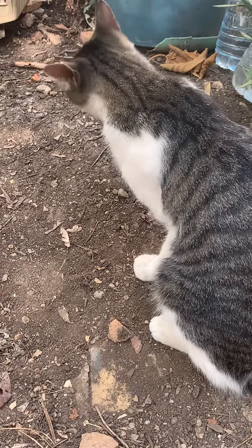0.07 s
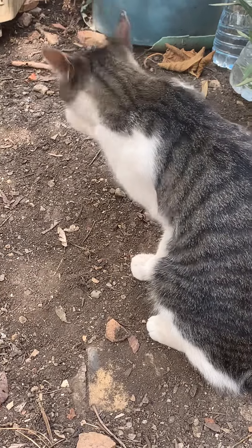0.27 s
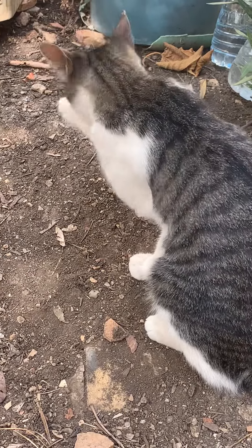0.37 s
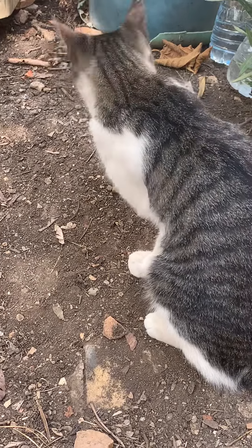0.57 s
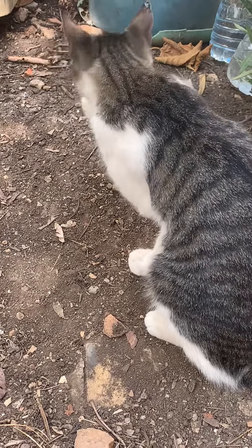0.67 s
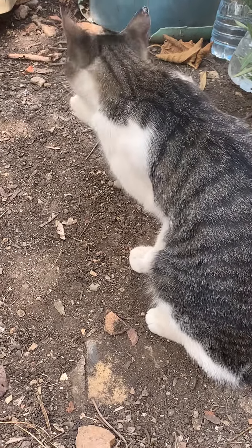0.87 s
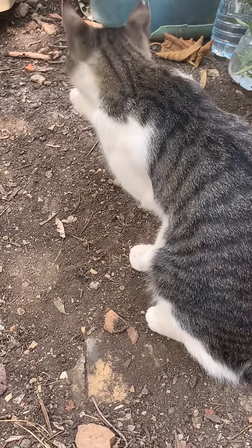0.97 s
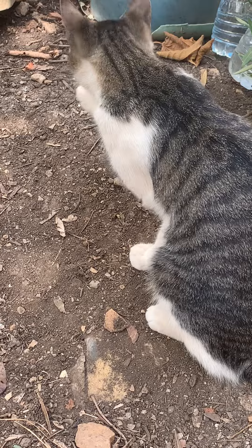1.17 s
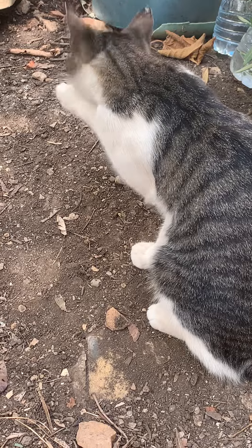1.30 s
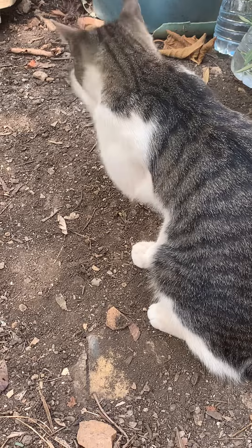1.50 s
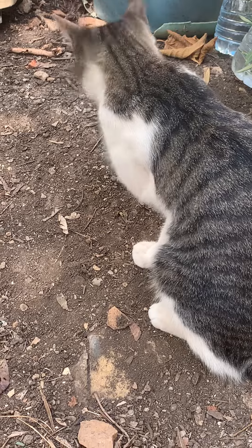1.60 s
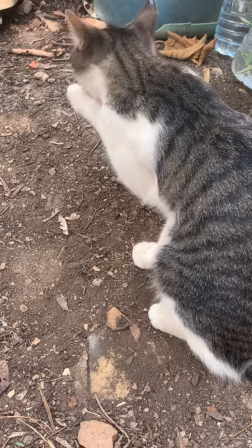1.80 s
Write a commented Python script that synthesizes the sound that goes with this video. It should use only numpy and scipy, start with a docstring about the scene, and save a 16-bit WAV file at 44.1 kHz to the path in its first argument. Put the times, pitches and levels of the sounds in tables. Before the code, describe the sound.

A cat licks its paw in short, thin, raspy strokes, two ending in a wet tick. Low wind rumble and soft bumps hit the hand-held microphone, strongest at the start, while traffic murmurs far off outdoors.

```python
"""A cat washing its paw outdoors

Tongue barbs flick through fur in short, thin, raspy licks, two of them ending in a wet tick.
Air and handling at the hand-held microphone give a low rumble and soft bumps.
Far traffic murmurs behind; near the end come faint distant calls and a soft, narrow-band rustle."""
import sys
import numpy as np
from scipy import signal
from scipy.fft import rfft, irfft, next_fast_len
from scipy.io import wavfile
from scipy.ndimage import uniform_filter1d, map_coordinates

SR = 44100
rng = np.random.default_rng(int(sys.argv[2]) if len(sys.argv) > 2 else 0)


def to_wav(s):
    """Save 16-bit WAV."""
    ch = np.atleast_2d(s).T  # columns
    pcm = np.round(np.clip(ch, -1, 1) * 32767)  # PCM
    wavfile.write(sys.argv[1], SR, pcm.astype(np.int16))


N = 81585
T = np.arange(N) / SR


def amp(db):
    """Amplitude ratio of a level in decibels."""
    return 10 ** (np.asarray(db) / 20)


def unit(x):
    """Normalisation to rms 1."""
    return x / np.sqrt(np.mean(x ** 2) + 1e-20)


def along(points, hz):
    """Interpolation on a logarithmic frequency axis."""
    knots_hz, values = np.transpose(points)
    return np.interp(np.log(hz + 1), np.log(knots_hz + 1), values)


def level(points):
    """Amplitude envelope through (time [s], level [dB]) points."""
    return amp(np.interp(T, *np.transpose(points)))


def swell(start, rise, fall, hold=0):
    """Exponential growth until start, a hold, then decay; rise and fall are times for 20 dB."""
    return amp(-20 * np.maximum(np.maximum((start - T) / rise, (T - start - hold) / fall), 0))


def wobble(knots_per_s):
    """Smooth random modulation: a spline through Gaussian values."""
    return map_coordinates(rng.standard_normal(int(N * knots_per_s / SR) + 4), [T * knots_per_s])


def filtered(x, response):
    """Linear filtering: the spectrum times a complex frequency response."""
    size = next_fast_len(N + SR // 2)
    return irfft(rfft(x, size) * response(np.fft.rfftfreq(size, 1 / SR)), size)[..., :N]


def coloured(x, spectrum):
    """Spectral shaping, at rms 1."""
    return unit(filtered(x, lambda hz: amp(along(spectrum, hz))))


def narrow_noise(hz, width):
    """Narrow-band noise at rms 1, heard as a fuzzy tone."""
    return unit(filtered(rng.standard_normal(N), lambda f: 1 / (1 + ((f - hz) / width) ** 2) ** 0.78))


def even_noise(spectrum):
    """Envelope flattening: noise divided by its smoothed magnitude loses its chance swells."""
    noise = coloured(rng.standard_normal(N), spectrum)
    power = np.abs(signal.hilbert(noise)) ** 2
    smoothed = uniform_filter1d(uniform_filter1d(power, size=900), size=900)
    return unit(noise / np.sqrt(np.abs(smoothed) + 1e-6))


# Rumble envelope (time [s], level [dB])
RUMBLE_ENVELOPE = [(0, -46.5), (.06, -38.5), (.10, -42), (.135, -31.5), (.21, -25.5), (.28, -33),
                   (.365, -39), (.41, -35.5), (.46, -35), (.56, -50.5), (.70, -50.5), (.75, -37.5),
                   (.82, -45.5), (.9, -46), (1.05, -50.5), (1.22, -48), (1.27, -39), (1.33, -38),
                   (1.40, -32.5), (1.47, -52), (1.52, -40.5), (1.65, -43.5), (1.71, -56), (1.85, -48)]
# Rumble spectrum (frequency [Hz], level [dB])
RUMBLE_SPECTRUM = [(15, -18.5), (28, -18), (45, -1.5), (60, 4.5), (85, -5), (120, -14), (170, -18.5),
                   (250, -35.5), (400, -46), (700, -86), (2000, -120)]


def air_rumble():
    """Pressure fluctuations of air buffeting the microphone make low noise, alike in both channels."""
    return level(RUMBLE_ENVELOPE) * even_noise(RUMBLE_SPECTRUM)


# Murmur spectrum (frequency [Hz], level [dB])
TRAFFIC_SPECTRUM = [(60, -3), (130, -7), (250, 0), (320, -5), (400, -2.5), (600, -7), (720, -9.5),
                    (900, -11), (1450, -8), (1800, -11.5), (2600, -21), (3400, -22), (4500, -26),
                    (5500, -26), (7000, -33), (10000, -31.5), (12500, -34), (15000, -39.5)]
# Left-right likeness (frequency [Hz], correlation [1])
TRAFFIC_CORRELATION = [(250, 1), (400, 1), (650, 0.54), (1300, -0.15), (2400, -0.56), (4000, -0.41),
                       (5000, -1.02), (7300, 0.96), (10000, -1.8), (12400, 1), (15000, -0.46)]
# Bands that swell independently (lower edge [Hz], upper edge [Hz])
TRAFFIC_BANDS = [(200, 600), (600, 1200), (1200, 2200), (2200, 3200), (3200, 4800)]
# Murmur envelope (time [s], level [dB])
TRAFFIC_ENVELOPE = [(0, -62.5), (.55, -59.5), (.9, -62), (1.1, -60.5), (1.35, -63), (1.5, -64),
                    (1.68, -65.5), (1.85, -60)]
# Faint whines (frequency [Hz], half-width [Hz], level [dB])
TRAFFIC_WHINES = [(723.7, 4.6, -77), (1453, 8.9, -83.5)]


def far_traffic():
    """Partial correlation between the channels makes the dull murmur of far traffic sound wide."""
    def mid_side_gains(hz):
        angle = np.arccos(np.clip(along(TRAFFIC_CORRELATION, hz), -1, 1)) / 2
        return amp(along(TRAFFIC_SPECTRUM, hz)) * [np.cos(angle), np.sin(angle)]

    mid, side = filtered(rng.standard_normal((2, N)), mid_side_gains)
    murmur = unit(np.array([mid + side, mid - side]))
    swelling = np.zeros((2, N))
    for low, high in TRAFFIC_BANDS:
        band = filtered(murmur, lambda hz: (hz >= low) & (hz < high))
        swelling += band * (amp(db=1.3 * wobble(knots_per_s=18)) - 1)
    whine = sum(amp(db) * narrow_noise(hz, width) for hz, width, db in TRAFFIC_WHINES)
    return level(TRAFFIC_ENVELOPE) * (murmur + swelling) + whine


def rasp(spectrum, clicks_per_s=6000, click_share=.68):
    """Shot noise: tongue barbs flicking through fur add dense, tiny clicks to a hiss."""
    clicks = unit((rng.random(N) < clicks_per_s / SR) * rng.standard_normal(N))
    hiss = rng.standard_normal(N)
    return coloured(np.sqrt(click_share) * clicks + np.sqrt(1 - click_share) * hiss, spectrum)


# Tongue strokes (time [s], hold [s], level [dB], rise [s], fall [s], low rasp re high rasp [dB])
LICKS = [(.010, 0.03, -58.5, .022, 0.03, -10), (0.169, 0.038, -68, 0.018, .06, -3.5),
         (0.33, .012, -56, 0.011, .014, -8), (0.494, 0.0084, -71, .02, 0.017, -4),
         (0.638, 0.012, -56.5, 0.019, 0.018, -5.5), (1.128, 0.0054, -62, .02, 0.009, -13),
         (1.3, 0.013, -71.5, 0.059, .06, -15.5), (1.521, 0.015, -67, 0.04, 0.026, -37),
         (1.571, .014, -64, 0.036, 0.047, -38.5)]
# Spectra of the high and low rasp (frequency [Hz], level [dB])
HIGH_RASP_SPECTRUM = [(2000, -36), (3500, -18), (5000, -8.5), (7500, -6), (10000, -9.5), (12400, 1.5),
                      (14500, -3.5), (15700, -4.5)]
LOW_RASP_SPECTRUM = [(1200, -15.5), (2300, -4.5), (4400, 3.5), (6500, 0.5), (9000, -10.5), (14000, -25)]


def licks():
    """Friction of tongue on fur: each stroke is a burst of high and low rasp."""
    high, low = rasp(HIGH_RASP_SPECTRUM), rasp(LOW_RASP_SPECTRUM)
    return sum(amp(db) * swell(start, rise, fall, hold) * (high + amp(low_db) * low)
               for start, hold, db, rise, fall, low_db in LICKS)


# Bumps on the microphone body (time [s], peak level [dB], frequency [Hz], 20 dB fall [s])
BUMPS = [(0.057, -32, 110.7, 0.058), (0.131, -19.5, 143.7, 0.042), (0.194, -21, 97, 0.053),
         (0.1953, -18, 172.5, 0.0054), (0.382, -32.5, 199, 0.01), (.390, -20, 79, 0.017),
         (0.45, -31.5, 110, 0.033), (0.52, -41, 100, 0.045), (0.726, -43, 185, 0.012),
         (0.734, -33, 96.4, 0.015), (0.819, -33, 85, 0.012), (.895, -48.5, 127.5, 0.086),
         (1.257, -40.5, 144, 0.042), (1.308, -29, 93.2, 0.058), (1.326, -20.5, 84.7, 0.025),
         (1.38, -28, 203.5, 0.027), (1.394, -32, 111, 0.025), (1.502, -39.5, 123, 0.029)]


def handling_bumps(attack_cycles=0.59, pitch_sag=0.046):
    """Damped oscillation: each bump on the microphone rings for a few soft cycles, sagging in pitch."""
    out = np.zeros(N)
    for start, db, hz, fall in BUMPS:
        age = np.maximum(T - start, 0)
        pitch = hz * (1 - pitch_sag * (1 - np.exp(-age / fall)))
        cycles = np.cumsum((age > 0) * pitch) / SR
        attack = 1 - np.exp(-(cycles / attack_cycles) ** 2)
        envelope = attack * amp(-20 * age / fall)
        out += amp(db) * envelope / envelope.max() * np.sin(2 * np.pi * cycles)
    return out


# Flutter envelope (time [s], level [dB])
FLUTTER_ENVELOPE = [(.11, -101), (.127, -33.5), (.155, -34.5), (.195, -24), (.225, -36), (.275, -34.5),
                    (.292, -58.5), (.32, -43.5), (.345, -87)]
# One short scuff (time [s], level [dB], rise [s], fall [s])
SCUFF = (.197, -54, .004, .016)
# Spectra of flutter and scuff (frequency [Hz], level [dB])
FLUTTER_SPECTRUM = [(50, -20.5), (110, -11.5), (180, 3), (240, -8.5), (310, -14.5), (400, -34.5),
                    (600, -46.5), (1000, -80.5), (2500, -120)]
SCUFF_SPECTRUM = [(200, -12), (480, 23.5), (650, 8), (1000, -18), (2000, -36), (5000, -120)]


def strongest_buffet():
    """Amplitude-modulated noise: the strongest buffet of air adds a low flutter and a scuff."""
    time, db, rise, fall = SCUFF
    scuff = amp(db) * swell(time, rise, fall) * coloured(rng.standard_normal(N), SCUFF_SPECTRUM)
    return level(FLUTTER_ENVELOPE) * even_noise(FLUTTER_SPECTRUM) + scuff


# Rustles (time [s], level [dB], rise [s], fall [s])
RUSTLES = [(.226, -59, .004, 0.011), (0.251, -66, 0.12, 0.18), (.36, -68.5, 0.093, 0.071),
           (.54, -74, .01, 0.046), (.719, -68, 0.35, 0.073), (1.08, -71.5, 0.039, .09),
           (1.235, -78, 0.1, 0.29), (1.43, -70, .11, 0.053)]
# Rustle spectrum (frequency [Hz], level [dB])
RUSTLE_SPECTRUM = [(700, -46), (1500, -20.5), (2500, 6), (4200, 6.5), (5500, -1), (7000, -5.5), (9000, -15),
                   (14000, -11.5)]


def fur_rustles():
    """Friction noise of brushed fur comes in soft swells."""
    envelope = sum(amp(db) * swell(time, rise, fall) for time, db, rise, fall in RUSTLES)
    return envelope * rasp(RUSTLE_SPECTRUM)


# Wet ticks (time [s], crackle level [dB], snap level [dB], ring level [dB])
TICKS = [(0.3379, -55, -52, -45), (1.136, -41.5, -33.5, -51), (1.1404, -51, -46.5, -54.5)]
# Spectra of crackle and snap (frequency [Hz], level [dB])
CRACKLE_SPECTRUM = [(800, -19), (1700, -8), (3000, -10.5), (4600, -1.5), (6000, -10), (7800, -2),
                    (10200, -3), (12400, -0.5), (15600, -1.5)]
SNAP_SPECTRUM = [(700, -12), (1500, -3), (3000, -4), (4600, -1), (6000, -8), (8000, -3), (10200, -1),
                 (12400, 2), (15600, 1)]


def wet_ticks():
    """A broadband transient as the wet tongue lets go: a sharp snap amid crackle and a thin ring."""
    crackle = rasp(CRACKLE_SPECTRUM)
    snap = coloured(rng.standard_normal(N), SNAP_SPECTRUM)
    ring = narrow_noise(hz=12840, width=1800)
    out = np.zeros(N)
    for time, crackle_db, snap_db, ring_db in TICKS:
        out += swell(time, rise=.007, fall=.008) * (amp(crackle_db) * crackle + amp(ring_db) * ring)
        out += swell(time, rise=.0004, fall=.0004) * amp(snap_db) * snap
    return out


# Faint distant calls and, at 1.513 s, a soft, narrow-band rustle
# (centre time [s], 1/e half-length [s], frequency [Hz], waver [Hz], level [dB], left lead [rad])
CALLS_AND_RUSTLE = [(1.242, 0.048, 3770, 350, -74.5, 2), (1.513, 0.037, 1616, 300, -66.5, 1.3),
                    (1.676, 0.01, 1090, 29, -71.5, .5), (1.682, 0.054, 4450, 350, -77, 2),
                    (1.703, 0.035, 3960, 124, -74.5, 1.3), (1.775, 0.032, 752, 11.3, -66, 0.54),
                    (1.81, 0.047, 1650, 49, -69.5, 1.2), (1.803, 0.012, 2830, 140, -69, 2.6),
                    (1.84, 0.019, 3000, 164, -68, 1.8)]


def calls_and_rustle(wavers_per_s=700, flicker_db=2.5):
    """Random frequency modulation: a small waver leaves a note, a wide one a rough call or a rustle."""
    out = np.zeros((2, N))
    for centre, half_length, hz, waver, db, lead in CALLS_AND_RUSTLE:
        phase = 2 * np.pi * np.cumsum(hz + waver * wobble(wavers_per_s)) / SR
        gain = amp(db + flicker_db * wobble(wavers_per_s))
        envelope = np.exp(-((T - centre) / half_length) ** 2)
        out += np.sqrt(2) * gain * envelope * np.sin(phase + np.array([[.5], [-.5]]) * lead)
    return out


# Lead of the left microphone port over the right (frequency [Hz], phase [rad])
PORT_LEAD = [(0, 0), (1000, .5), (2100, 2.1), (3000, 2.45), (4100, 2.45), (5000, 3.14), (6500, 4.9),
             (7600, 6.28), (10000, 9.42), (12400, 12.57), (15000, 15.7), (16000, 16.9)]


def from_cat(x):
    """Phase difference: sound from the cat reaches the left port first."""
    half_each_way = np.array([[.5j], [-.5j]])
    return filtered(x, lambda hz: np.exp(half_each_way * np.interp(hz, *np.transpose(PORT_LEAD))))


def yard_echo(x, t60_s=0.15):
    """Reverberation: reflections from the walls around form a short, exponentially decaying tail."""
    age = np.arange(SR // 2) / SR
    tail = rng.standard_normal((2, len(age))) * amp(-60 * age / t60_s)
    return signal.fftconvolve(x, tail / np.linalg.norm(tail[0]), axes=1)[:, :N]


def scene():
    """Superposition of the cat, its reverberation, noise at the microphone and the background."""
    cat = from_cat(licks() + fur_rustles() + wet_ticks())
    reverberation = amp(db=-13.5) * yard_echo(cat)
    microphone_noise = air_rumble() + handling_bumps() + strongest_buffet()
    return cat + reverberation + microphone_noise + far_traffic() + calls_and_rustle()


def record(dry):
    """Band limiting: an ideal low-pass filter removes the highest treble."""
    return filtered(dry, lambda hz: hz < 15800)


dry = scene()
out = record(dry)
to_wav(out)
```